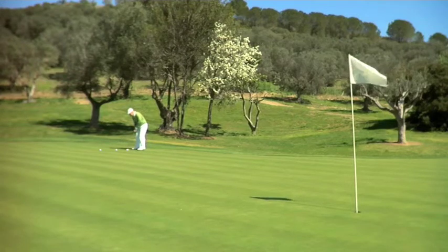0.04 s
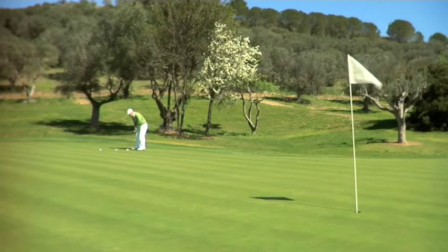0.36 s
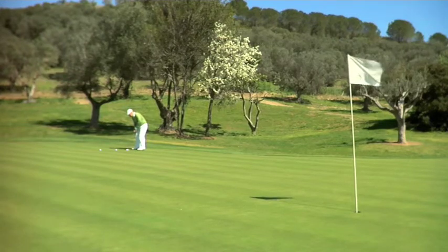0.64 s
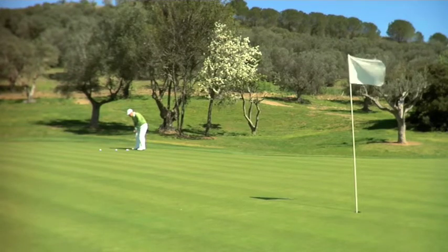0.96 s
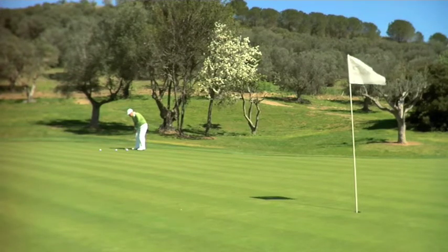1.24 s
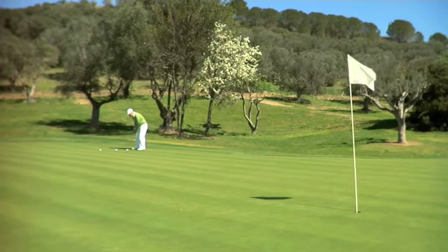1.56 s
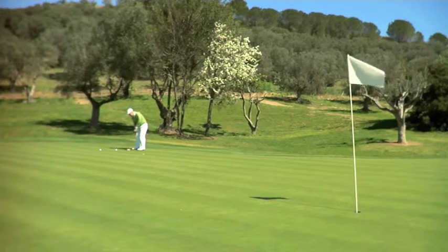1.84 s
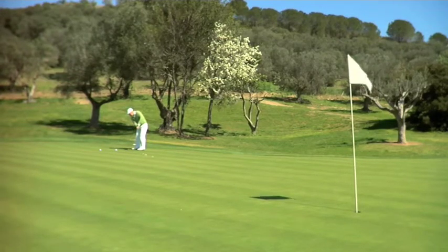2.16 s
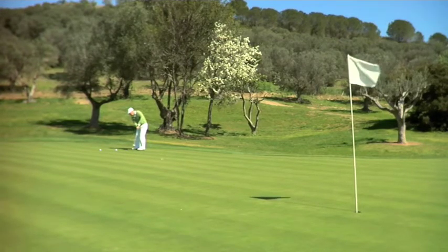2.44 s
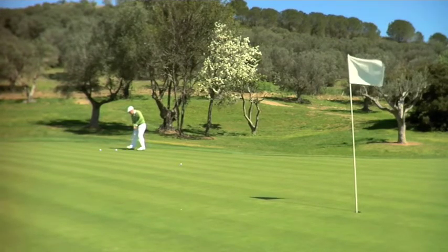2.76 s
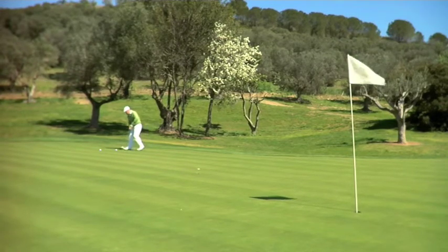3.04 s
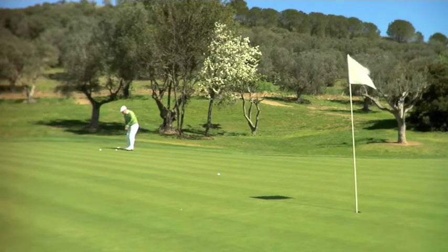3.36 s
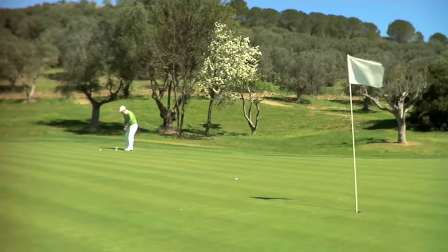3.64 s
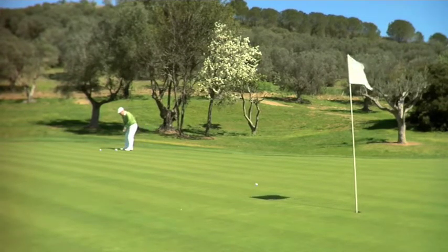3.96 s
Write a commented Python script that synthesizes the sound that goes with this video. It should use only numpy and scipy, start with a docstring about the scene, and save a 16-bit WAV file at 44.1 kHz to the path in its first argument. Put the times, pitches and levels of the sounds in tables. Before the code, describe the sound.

A putter hits a golf ball once with a sharp, dry click, slightly to the left, on a quiet open green. Light wind rumbles on the microphone throughout, and tiny distant bird chirps follow over a soft hiss.

```python
"""A putter strikes a golf ball once on a quiet, open green, a little to the left.
The brief elastic contact force radiates as a dry click; the head's damped modes add a metallic ring
and the turf scatters the sound. Light gusts rumble on the microphone as turbulent pressure noise.
A few faint ticks pass and small birds chirp far away, over a soft hiss and the camera's thin whine."""
import sys
import numpy as np
from scipy import signal
from scipy.fft import rfft, irfft, next_fast_len
from scipy.io import wavfile
from scipy.ndimage import map_coordinates

SR = 44100
rng = np.random.default_rng(int(sys.argv[2]) if len(sys.argv) > 2 else 0)


def wrap_up_sound(samples):
    """Save the sound to the file named by the first command line argument, as 16-bit audio."""
    columns = np.atleast_2d(samples).T
    # keep every value between -1 and 1, then stretch to whole-number steps
    tamed = np.clip(columns, -1, 1)
    steps = np.round(tamed * 32767).astype(np.int16)
    wavfile.write(sys.argv[1], SR, steps)


N = 176400

# Radiation of the contact force by ball and head: frequency_hz, gain_db
RADIATION_RESPONSE = [(150, -25.5), (300, -5.5), (500, 4.5), (700, 10), (1100, 16), (1700, 18.5),
                      (2300, 23.5), (3400, 25.5), (4300, 30.5), (4950, 44), (5900, 36.5), (6900, 34.5),
                      (10000, 23.5), (14000, 38)]
# Modes of the putter head: frequency_hz, level_db, t60_s
HEAD_MODES = [(1077, -40, .017), (3828, -43, .035)]
# The click as the turf scatters it: frequency_hz, gain_db
TURF_RESPONSE = [(200, -19), (500, -12), (800, -29), (1100, -10), (1750, -8.5), (2600, -18.5), (5000, -24),
                 (6500, -24), (9000, -35), (14000, -40)]
# Level difference of the putt between the ears: frequency_hz, left_minus_right_db
EAR_DIFFERENCE = [(500, 3.5), (1500, 5), (3400, 4), (5000, 7), (7000, 2)]
PUTT_S, PUTT_GAIN_DB, LEFT_LEAD_S = 1.98893, -0.5, .00002
CONTACT_S, FORCE_EXPONENT = .000625, 1.505
SCATTER_GAIN_DB, SCATTER_T60_S = 1.5, .03

# Wind strength: time_s, strength_db
GUST_CURVE = [(0.0, -61.5), (0.25, -62), (0.44, -54.5), (0.55, -59), (0.8, -55), (1.0, -53.5),
              (1.15, -57.5), (1.27, -58.5), (1.37, -60.5), (1.58, -53.8), (1.79, -50), (1.96, -57),
              (2.18, -61.5), (2.36, -51.8), (2.55, -59), (2.68, -53.1), (2.93, -59.5), (3.15, -53.5),
              (3.3, -51), (3.42, -55.5), (3.54, -48.5), (3.6, -52.5), (3.68, -50), (3.82, -52),
              (3.9, -49.5), (4.0, -59.5)]
# Eddies that bump the microphone: centre_s, level_db
EDDY_BUMPS = [(.455, -51), (.92, -55), (1.272, -52), (1.737, -48), (1.786, -48), (2.3, -52), (2.637, -51),
              (3.148, -46), (3.225, -53), (3.274, -51), (3.546, -41.5), (3.657, -46), (3.698, -46.5)]
# Spectra of the three wind noises: frequency_hz, relative_db
RUMBLE_SPECTRUM = [(12, -34.5), (20, -8.5), (59, 1.5), (97, 2), (149, -1.5), (500, -23), (650, -38),
                   (1100, -120)]
BUFFET_SPECTRUM = [(40, -25), (110, -2), (180, -1), (300, -4.5), (500, -9), (750, -15), (1100, -31.5),
                   (2000, -62.5), (4000, -50)]
EDDY_SPECTRUM = [(60, -4), (200, 1.5), (430, 1), (700, -8), (950, -16.5), (1400, -33.5), (3000, -60)]
RUMBLE_DB, RUMBLE_GUST_SHARE = -51.5, 0.63
BUFFET_GAIN_DB, FLUTTER_DB, EDDY_HALF_WIDTH_S = -4.5, 1.5, 0.0062

# Faint ticks: start_s, level_db, centre_hz, width_octaves
TICK_BURSTS = [(0.028, -61, 2770, 0.78), (.309, -64, 2400, 0.67), (.544, -66, 3000, 0.83),
               (.640, -57.5, 1970, 0.73), (.834, -60.5, 1200, 0.66), (1.419, -58.5, 8500, 0.24),
               (2.689, -65, 5200, .3), (3.459, -55.5, 1290, 0.5)]
TICK_T60_S = 0.022

# Distant bird notes: start_s, length_s, start_pitch_hz, end_pitch_hz, level_db
BIRD_NOTES = [(.15, .12, 747, 754, -65.5), (.3, 0.083, 748, 760, -64.5), (2.695, 0.032, 7350, 6900, -73),
              (2.752, .033, 7050, 6750, -70), (2.945, 0.036, 6200, 5950, -72),
              (2.97, 0.16, 9100, 8550, -81), (3.708, .033, 7500, 7360, -68.5),
              (3.895, 0.058, 5680, 5900, -62)]
TWITTER_SPAN_S, TWITTER_RANGE_HZ, TWITTER_COUNT, TWITTER_DB = (3.3, 3.9), (4900, 8750), 26, -81
TWITTER_NOTE_S, TWITTER_GLIDE_HZ, WARBLE_SHARE = 0.032, 300, .009

# Steady hiss: frequency_hz, relative_db
HISS_SPECTRUM = [(100, 9.5), (500, 7.5), (740, 11.5), (950, 6.5), (1400, 3.5), (2000, -0.5), (2600, -5.5),
                 (3100, -4.5), (3600, 1.5), (3950, -3.5), (4400, -3.5), (4750, -1), (5400, -4.5),
                 (6100, -1), (6900, -6), (7800, -5.5), (9200, -9.5), (9900, -7.5), (10700, -13),
                 (15500, -14)]
# The camera's steady tones: pitch_hz, rms_db, phase_jitter_rad
CAMERA_TONES = [(879, -86, .1), (1056, -87.5, .1), (1226, -79, .2), (3747, -76, 0.87), (15622, -103, .5)]
# Resonances of its whirr: centre_hz, rms_db, half_width_hz
WHIRR_RESONANCES = [(3754, -83.5, 81), (4077, -86.5, 25), (4250, -87.5, 29)]
HISS_DB, JITTER_RATE_HZ, BAND_LIMIT_HZ = -67, 110, 15900


def putt():
    """Elastic impact: a force pulse radiates a click, damped modes ring and the turf scatters sound."""
    t = np.arange(SR // 10) / SR
    force = np.abs(np.sin(np.pi * np.minimum(t / CONTACT_S, 1))) ** FORCE_EXPONENT
    click = np.convolve(force / force.sum(), minimum_phase(RADIATION_RESPONSE))[:len(t)]
    ring = sum(amp(db - 60 * t / t60) * np.sin(2 * np.pi * hz * t) for hz, db, t60 in HEAD_MODES)
    echoes = rng.standard_normal(len(t)) * amp(-60 * t / SCATTER_T60_S) * (t > 2 * CONTACT_S)
    echoes /= np.linalg.norm(echoes)
    scatter = signal.fftconvolve(minimum_phase(TURF_RESPONSE), echoes)[:len(t)]
    track = np.zeros(N)
    add(track, PUTT_S, amp(PUTT_GAIN_DB) * (click + ring + amp(SCATTER_GAIN_DB) * scatter))
    return track


def from_left(sound):
    """Interaural level and time differences: the nearer, left ear hears the sound louder and sooner."""
    sides = np.array([[.5], [-.5]])

    def ears(hz):
        gain = amp(sides * along(EAR_DIFFERENCE, hz))
        return gain * np.exp(2j * np.pi * hz * sides * LEFT_LEAD_S)
    return filtered(sound, ears)


def wind():
    """Turbulent pressure: gusts lift a deep rumble a little and a brighter buffet more; eddies bump."""
    t = np.arange(N) / SR
    gust_db = np.interp(t, *np.transpose(GUST_CURVE))
    swing_db = gust_db - gust_db.mean()
    rumble = amp(RUMBLE_DB + RUMBLE_GUST_SHARE * swing_db) * coloured(RUMBLE_SPECTRUM)
    flutter_db = FLUTTER_DB * wobble(rate_hz=60)
    buffet = amp(BUFFET_GAIN_DB + gust_db + flutter_db) * coloured(BUFFET_SPECTRUM)
    bumps = sum(amp(db) * np.exp(-((t - s) / EDDY_HALF_WIDTH_S) ** 2) for s, db in EDDY_BUMPS)
    return rumble + buffet + bumps * coloured(EDDY_SPECTRUM)


def ticks():
    """Exponential decay: each dry tick is a fast-dying burst of noise in its own band."""
    track, t = np.zeros(N), np.arange(SR // 10) / SR
    for start_s, db, centre_hz, octaves in TICK_BURSTS:
        band = noise(lambda hz: np.exp(-.5 * (np.log2((hz + 1) / centre_hz) / octaves) ** 2))
        add(track, start_s, amp(db - 60 * t / TICK_T60_S) * band[:len(t)])
    return track


def birds():
    """Frequency modulation: each whistle glides and warbles; faint random notes twitter near the end."""
    track = np.zeros(N)
    low, high = np.transpose([TWITTER_SPAN_S, TWITTER_RANGE_HZ, (-1, 1)])
    twitter = [(start_s, TWITTER_NOTE_S, hz, hz + TWITTER_GLIDE_HZ * bend, TWITTER_DB)
               for start_s, hz, bend in rng.uniform(low, high, (TWITTER_COUNT, 3))]
    for start_s, length_s, start_hz, end_hz, db in list(BIRD_NOTES) + twitter:
        progress = np.linspace(0, 1, int(length_s * SR))
        glide_hz = start_hz + (end_hz - start_hz) * progress
        warble = 1 + WARBLE_SHARE * wobble(rate_hz=300)[:len(progress)]
        phase = 2 * np.pi * np.cumsum(glide_hz * warble) / SR
        add(track, start_s, amp(db) * np.sin(np.pi * progress) * np.sin(phase))
    return track


def camera():
    """Self-noise: phase-jittered tones and narrow noise-driven resonances whine over a broadband hiss."""
    t = np.arange(N) / SR
    tones = sum(amp(db) * unit(np.sin(2 * np.pi * hz * t + jitter * wobble(JITTER_RATE_HZ)))
                for hz, db, jitter in CAMERA_TONES)
    whirr = sum(amp(db) * noise(lambda hz: 1 / (1 + ((hz - centre_hz) / half_width_hz) ** 2))
                for centre_hz, db, half_width_hz in WHIRR_RESONANCES)
    return amp(HISS_DB) * coloured(HISS_SPECTRUM) + tones + whirr


def amp(db):
    """Amplitude ratio of a level in decibels."""
    return 10 ** (np.asarray(db) / 20)


def unit(x):
    """Normalisation to rms 1."""
    return x / np.sqrt(np.mean(x ** 2) + 1e-30)


def along(points, hz):
    """Interpolation of (frequency_hz, value) points on a logarithmic frequency axis."""
    knots_hz, values = np.transpose(points)
    return np.interp(np.log(hz + 1), np.log(knots_hz + 1), values)


def wobble(rate_hz):
    """Smooth random modulation: a spline through rate_hz Gaussian values a second."""
    knots = rng.standard_normal(int(N * rate_hz / SR) + 4)
    return map_coordinates(knots, [np.arange(N) * rate_hz / SR])


def filtered(x, response):
    """Linear filtering: the spectrum of x times a complex frequency response."""
    size = next_fast_len(N + SR // 2)
    return irfft(rfft(x, size) * response(np.fft.rfftfreq(size, 1 / SR)), size)[..., :N]


def noise(response):
    """Spectral shaping of white noise, scaled to rms 1."""
    return unit(filtered(rng.standard_normal(N), response))


def coloured(points):
    """Coloured noise of rms 1 with a (frequency_hz, relative_db) spectrum."""
    return noise(lambda hz: amp(along(points, hz)))


def minimum_phase(points, size=4096):
    """Minimum phase: the tightest causal impulse response with a (frequency_hz, gain_db) spectrum."""
    magnitude = amp(along(points, np.fft.rfftfreq(size, 1 / SR)))
    cepstrum = irfft(np.log(magnitude))
    causal_fold = np.r_[1, np.full(size // 2 - 1, 2), 1, np.zeros(size // 2 - 1)]
    return irfft(np.exp(rfft(cepstrum * causal_fold)))


def add(track, start_s, sound):
    """Superposition of a short sound on the track."""
    part = track[max(round(start_s * SR), 0):][:len(sound)]
    part += sound[:len(part)]


def scene():
    """Superposition: the putt on the left over a centred background."""
    return from_left(putt()) + wind() + camera() + ticks() + birds()


def record(dry):
    """Band limiting: the camera cuts off the highest treble with a steep low-pass."""
    return filtered(dry, lambda hz: 1 / np.sqrt(1 + (hz / BAND_LIMIT_HZ) ** 200))


dry = scene()
out = record(dry)
wrap_up_sound(out)
```